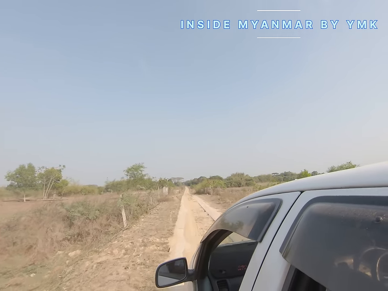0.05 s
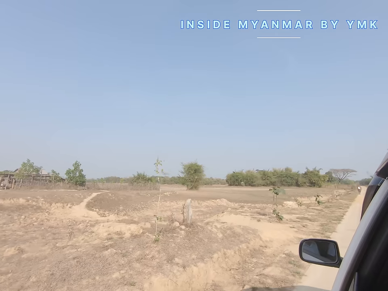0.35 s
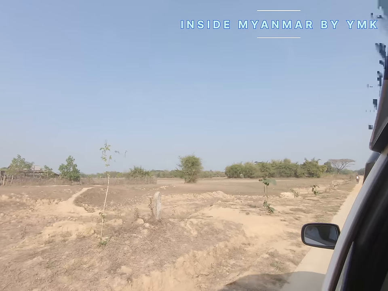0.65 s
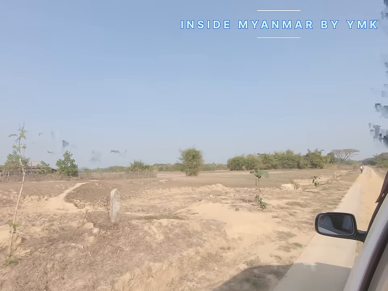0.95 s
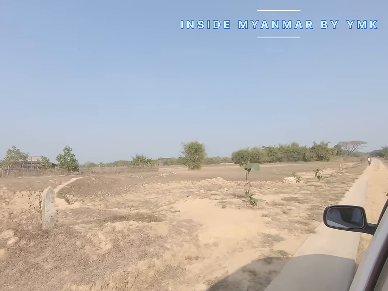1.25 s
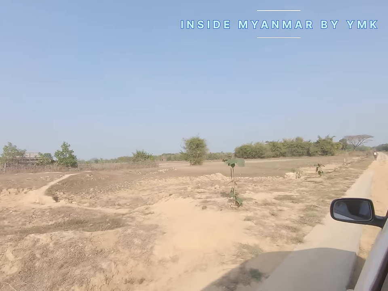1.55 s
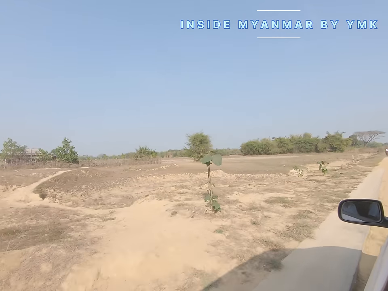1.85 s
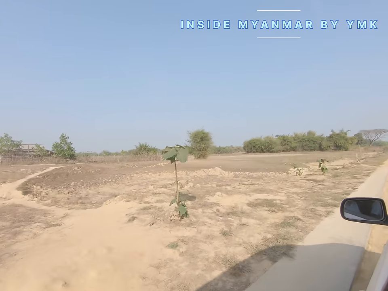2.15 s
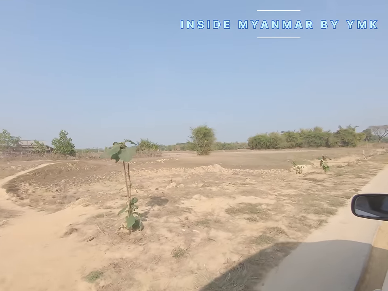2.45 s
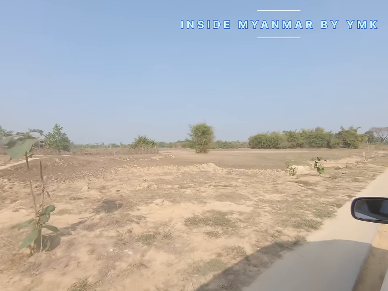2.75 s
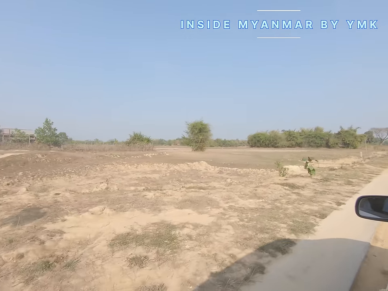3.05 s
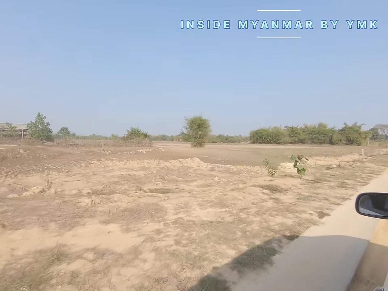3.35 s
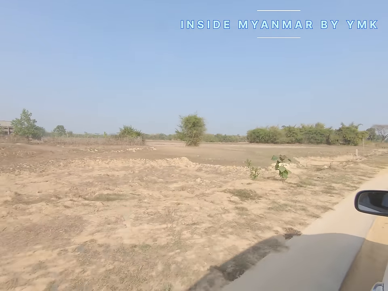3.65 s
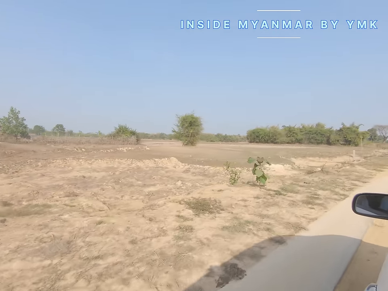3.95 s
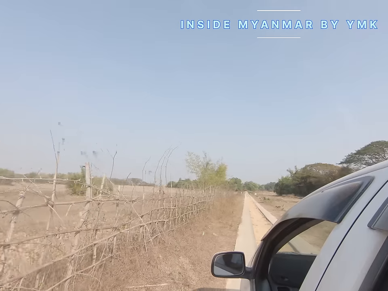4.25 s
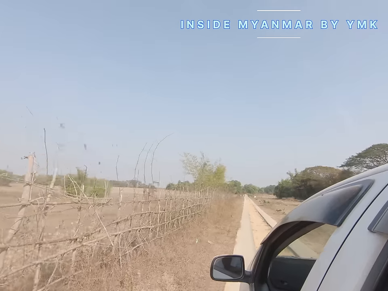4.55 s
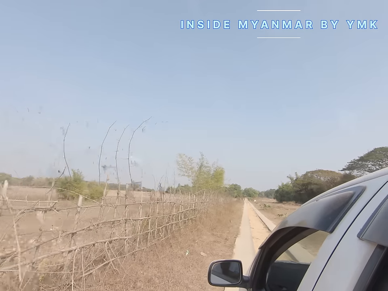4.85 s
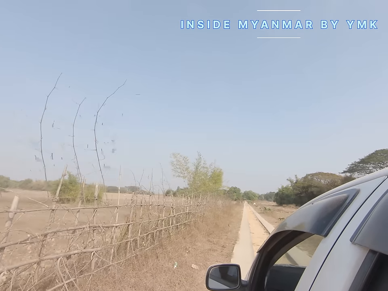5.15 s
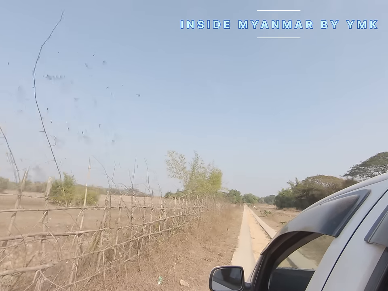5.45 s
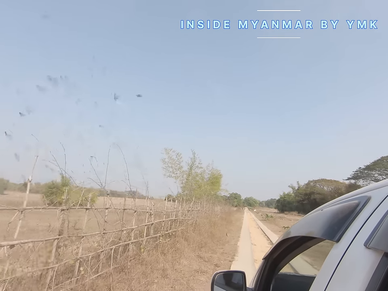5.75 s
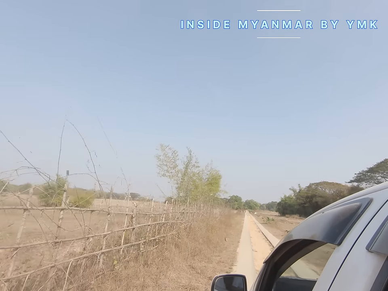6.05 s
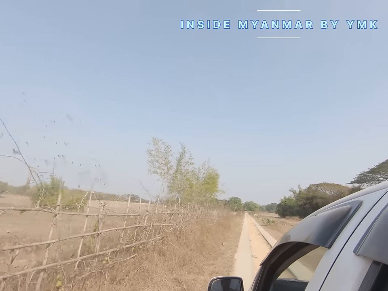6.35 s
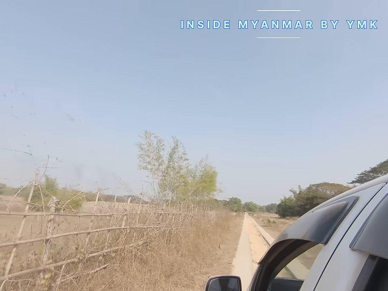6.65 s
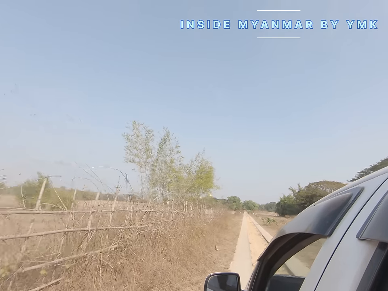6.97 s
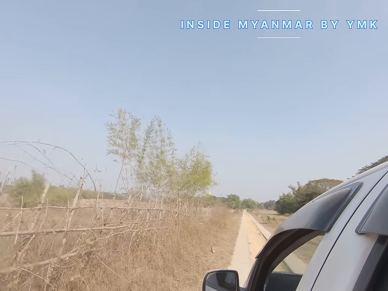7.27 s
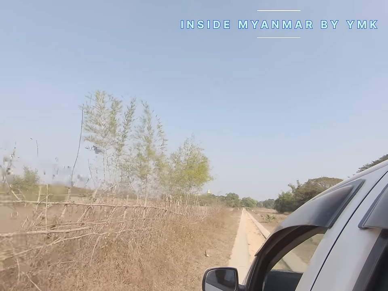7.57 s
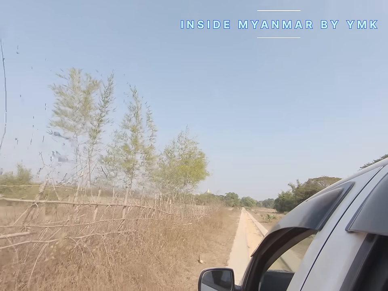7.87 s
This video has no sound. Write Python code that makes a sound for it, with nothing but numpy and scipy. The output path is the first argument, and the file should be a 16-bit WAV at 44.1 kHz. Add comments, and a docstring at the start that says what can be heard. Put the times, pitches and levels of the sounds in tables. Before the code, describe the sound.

Wind buffets a microphone held out of a car on a country road, a loud low rumble full of thumps and slaps. It cuts out for an instant just after the start. A distant bird chirps faintly over a thin hiss, then both stop as the wind builds to a rough, crackling peak. After a second brief dropout, softer, duller gusts rumble over quietly rolling tyres.

```python
"""Wind from a car window

Wind buffets a microphone held out of a car on a country road, in three stretches with brief dropouts
between them. Eddies (swirls of air) rumble and slap on it. At first air hisses over its two ports
(openings) and a bird sings a short echoing phrase; then these stop and both sides sound the same.
After the second dropout a softer wind rumbles over the rolling of the tyres."""
import sys
import numpy as np
from scipy import signal
from scipy.fft import rfft, irfft, next_fast_len
from scipy.io import wavfile
from scipy.ndimage import uniform_filter1d

SR = 44100
rng = np.random.default_rng(int(sys.argv[2]) if len(sys.argv) > 2 else 0)


def to_wav(sig):
    """Store sig (one row per channel, or 1-D mono) as 16-bit WAV at the path in sys.argv[1].

    Samples outside -1..1 are clipped; the rate is SR.
    """
    pcm = np.clip(np.atleast_2d(sig), -1, 1) * 32767
    pcm = np.round(pcm).astype(np.int16)
    wavfile.write(sys.argv[1], SR, pcm.T)  # frames by channels


N = 348831
TIME = np.arange(N) / SR


# Tone colours of strong rumble, soft rumble, churning, tearing and hiss.
# Each row: frequency in Hz, relative level in dB.
STRONG_RUMBLE = [(8, -39.5), (18, -1), (30, -4.5), (60, -2), (95, 1.5), (160, -5.5), (230, -19.5),
                 (400, -43), (900, -96), (16000, -120)]
SOFT_RUMBLE = [(8, -32.5), (18, 2), (35, 4), (65, 2.5), (115, -2), (160, -11.5), (230, -29), (400, -70),
               (900, -87)]
CHURN_COLOUR = [(80, -17.5), (140, -2), (200, 5), (300, -2.5), (420, -11), (600, -21.5), (1000, -53.5),
                (2500, -86.5), (16000, -110)]
TEAR_COLOUR = [(200, -24.5), (450, 12.5), (700, 6.5), (1000, -1.5), (1400, -13), (2000, -16.5),
               (3500, -40.5), (6000, -56.5), (9000, -80.5)]
HISS_COLOUR = [(600, 5.5), (1300, 3), (1800, -6.5), (2500, -6), (3300, -9.5), (4400, -14), (6000, -28),
               (8000, -48.5), (10000, -52.5), (16000, -72)]
# How squarely the wind meets the port, which helps it tear. Each row: time in seconds, boost in dB.
FACING = [(0, 7.5), (.8, -10), (2.2, -2), (3.25, -8), (3.55, -1), (4.085, -7), (4.25, 2), (7.91, -14)]
# Dull hiss of the strongest wind. Each row: time in seconds, level in dB.
HISS_LEVEL = [(2.76, -44), (2.87, -80), (3.1, -56), (3.14, -39.5), (3.3, -44.5), (3.37, -41.5), (3.57, -60),
              (3.9, -44.5), (4.085, -44)]

def wind(churn_db=-1.62, tear_db=-16, strong_db=-28, tear_growth=1.3):
    """Wind comes in bursts: big eddies rumble, smaller ones churn, the finest tear off and hiss."""
    sway = wander(22)
    buffet = wind_level(1) * from_db(.7 * sway)
    churn = wind_level(2) * from_db(1.25 * sway)
    bursts = np.minimum(unit(wander(150) + 1.5 * wander(45)), 2.1)
    # stronger wind rumbles higher
    strength = np.clip(uniform_filter1d(buffet, SR // 2) / from_db(-17), 0, 1)
    rumble = np.sqrt(strength) * noise(STRONG_RUMBLE) + np.sqrt(1 - strength) * noise(SOFT_RUMBLE)
    deep = from_db(1) * buffet * steadied(rumble * from_db(3 * wander(60)), .04)
    body = from_db(churn_db) * churn * steadied(noise(CHURN_COLOUR) * from_db(3 * bursts), .033)
    # fine eddies grow faster than the wind that sheds them
    tearing = from_db(strong_db + tear_db + follow(FACING)) * (churn / from_db(strong_db)) ** tear_growth
    fine = tearing * steadied(noise(TEAR_COLOUR) * from_db(6 * bursts), .29)
    hiss = level(HISS_LEVEL) * unit(noise(HISS_COLOUR) * from_db(4 * bursts))
    return deep + body + fine + hiss


# One list for each stretch of wind. Each row: time in seconds, rumble in dB, churning in dB.
WIND_STRETCHES = [
    [(0, -26, -32.5), (.121, -21, -36.5)],
    [(0.25, -39, -38.5), (0.27, -30, -44), (0.33, -21.5, -29), (0.42, -19, -31.5), (0.49, -19, -28),
     (0.65, -25, -30.5), (0.72, -20, -23), (0.89, -20, -36), (0.91, -19.5, -24), (1.11, -24, -28),
     (1.18, -21.5, -39), (1.32, -22.5, -23.5), (2.49, -21, -24), (2.51, -25.5, -30), (2.68, -20.5, -24),
     (3.5, -20, -19), (4.04, -18, -22), (4.08, -22.5, -32)],
    [(4.25, -37, -50), (4.29, -35, -56), (4.88, -29.5, -40.5), (5.15, -26, -43), (5.19, -21, -26),
     (5.27, -30.5, -41), (5.65, -32.5, -54), (5.95, -24.5, -34), (6.21, -31, -48), (6.31, -28.5, -61),
     (6.44, -28.5, -33.5), (6.49, -32.5, -69), (6.69, -20.5, -30.5), (6.88, -31.5, -49), (7.19, -20, -45),
     (7.27, -34, -51), (7.8, -24.5, -37.5), (7.91, -26.5, -37)],
]
# Swells and lulls. Each row: middle in seconds, half length in seconds, change in dB.
SURGES = [(.405, 0.024, -6), (0.492, 0.033, -1.5), (0.628, 0.023, -7), (0.793, 0.024, 1),
          (0.881, 0.013, -9.5), (.92, .03, 2), (0.995, 0.023, 3.5), (1.161, 0.011, -5), (1.26, 0.016, 1),
          (1.39, 0.018, -1), (1.462, 0.033, -2), (1.65, .015, 1.5), (1.722, 0.023, 2), (2.005, .014, -5.5),
          (2.225, 0.018, -3.5), (2.262, .02, 2.5), (2.328, 0.017, 3), (2.35, 0.0076, -3),
          (2.449, .014, -6.5), (2.485, 0.015, 4.5), (2.523, .018, -6.5), (2.6, .04, -0.5),
          (2.857, 0.015, 5), (2.962, 0.019, 0.5), (3.063, 0.047, 1.5), (3.14, 0.012, -6), (3.268, 0.024, 2),
          (3.277, 0.0087, -3), (3.408, 0.024, 2), (3.534, 0.04, -7), (3.597, 0.0099, -4), (3.693, 0.023, 1),
          (3.749, 0.022, 1), (3.824, 0.022, -5.5), (3.885, 0.014, -1.5), (4.33, .03, 8),
          (4.405, 0.02, -3.5), (4.705, 0.063, 5), (4.82, 0.012, -8), (5.138, 0.046, 3), (5.35, 0.034, -4.5),
          (5.678, 0.025, -7.5), (5.786, 0.02, -11.5), (5.88, 0.018, 3.5), (6.22, .025, -5.5),
          (6.376, 0.021, 1), (6.934, 0.011, -1), (7.088, 0.022, 3), (7.313, 0.035, -0.5),
          (7.532, 0.018, 1.5), (7.668, 0.044, 2.5), (7.741, 0.016, -10.5), (7.844, 0.025, -6)]

def wind_level(column):
    """How strongly the wind rumbles (column 1) or churns (column 2); zero in the dropouts."""
    surge_db = sum(db * bump(middle, width) for middle, width, db in SURGES)
    return sum(level(rows, column) for rows in WIND_STRETCHES) * from_db(surge_db)


# Big eddies. Each row: time in seconds, length in seconds, then thump, slap and crack levels in dB.
BIG_GUSTS = [(0.044, 0.017, -42, -34.5, -43), (0.122, 0.0016, -26, -22.5, -30),
             (0.305, 0.0019, -18, -32, -50), (0.34, 0.0049, -9, -40, -48), (0.491, 0.0025, -21, -51, -66),
             (0.534, 0.0027, -26, -33, -66), (0.69, 0.0066, -18, -32, -52),
             (0.735, 0.0047, -12.5, -30.5, -52), (0.925, 0.00073, -5.5, -13, -53),
             (0.947, 0.003, -38, -13.5, -31), (0.966, 0.0049, -7.5, -30, -42),
             (1.014, 0.0035, -14, -17, -46), (1.085, 0.0038, -9.5, -22.5, -38),
             (1.095, 0.0053, -14.5, -19.5, -40), (1.33, 0.0064, -12, -24, -49),
             (1.407, 0.0015, -15, -48, -66), (1.463, 0.0023, -30, -23, -37), (1.57, 0.012, -14.5, -29, -40),
             (1.588, 0.0034, -7.5, -24.5, -32.5), (1.63, 0.0024, -19.5, -23, -38),
             (1.702, 0.005, -15.5, -22.5, -34), (1.845, 0.0018, -14, -21.5, -32),
             (1.861, 0.0044, -27, -24.5, -47), (1.945, 0.013, -12, -30.5, -38),
             (1.968, 0.011, -10.5, -29, -40), (2.032, 0.0042, -14.5, -24, -56),
             (2.061, 0.0031, -6, -24.5, -38), (2.125, 0.0013, -4.5, -7.5, -29),
             (2.143, 0.014, -8.5, -31, -37), (2.294, 0.0023, -10.5, -20, -51),
             (2.376, 0.0035, -16, -23, -55), (2.393, 0.0053, -10, -19, -30),
             (2.407, 0.0098, -9, -19.5, -27.5), (2.413, 0.0048, -18, -16, -45),
             (2.562, 0.016, -20, -23.5, -104), (2.628, 0.0014, -15, -24.5, -63),
             (2.716, 0.016, -17.5, -24, -41), (2.824, 0.029, -34, -41, -43),
             (2.902, 0.0021, -14.5, -20, -32.5), (2.924, 0.0011, -8, -14, -34),
             (3.002, 0.004, -23, -19.5, -61), (3.115, 0.0023, -28, -29, -33),
             (3.126, 0.0075, -18, -20, -29), (3.131, 0.0084, -19.5, -21.5, -35),
             (3.137, 0.0016, -17.5, -15, -43), (3.176, 0.0017, -17, -12, -53),
             (3.357, 0.0027, -29, -13, -35), (3.368, 0.0019, -14, -8.5, -18), (3.459, 0.0011, -7, -23, -38),
             (3.476, 0.0035, -2.5, -21, -35), (3.5, 0.0036, -26.5, -16, -38),
             (3.507, 0.0028, -16, -13.5, -30), (3.524, 0.0033, -24.5, -17, -36),
             (3.542, 0.0027, -28, -16.5, -39), (3.559, 0.0029, -4.5, -28, -52),
             (3.584, 0.0018, -20.5, -17.5, -41.5), (3.628, 0.0017, -22, -19, -46),
             (3.645, 0.0034, -18.5, -17.5, -45), (3.665, 0.0032, -18.5, -17.5, -44.5),
             (3.709, 0.0033, -15, -17.5, -47), (3.749, 0.02, -14.5, -26, -50.5),
             (3.769, 0.0031, -14, -25.5, -56), (3.827, 0.019, -28, -24.5, -44),
             (3.855, 0.0026, -24.5, -20, -57.5), (3.957, 0.0081, -29, -20, -41.5),
             (3.992, 0.012, -32.5, -18.5, -40), (4.012, 0.0019, -16, -26, -29),
             (4.051, 0.0028, -10.5, -44.5, -33), (4.073, 0.019, -22.5, -37.5, -30.5),
             (4.327, 0.0036, -33, -68, -73), (4.468, 0.0034, -40, -67, -79),
             (4.943, 0.0047, -16.5, -38, -70), (5.198, 0.0034, -6.5, -30.5, -45.5),
             (5.203, 0.0019, 3.5, -24, -47.5), (5.72, 0.0053, -21, -68, -52),
             (5.984, 0.0085, -20, -58, -66), (6.427, .006, -15.5, -55, -50), (6.685, 0.0021, -19, -59, -74),
             (6.74, 0.0027, -11, -31, -66), (6.757, 0.0023, -12.5, -37, -74),
             (6.96, 0.0034, -2, -33.5, -56), (7.019, 0.0034, -17, -43, -68),
             (7.119, 0.0079, -17.5, -40.5, -67), (7.174, 0.0028, -5, -47, -70),
             (7.686, 0.0044, -19, -38, -62)]
# Tone colour of all hits. Each row: frequency in Hz, relative level in dB.
GUST_COLOUR = [(50, 0.5), (170, -7), (330, -6), (620, -6.5), (1000, -12), (1800, -8), (3300, -20),
               (5000, -42), (9000, -63.5)]
# Deeper parts of a hit last longer. Each row: low edge in Hz, high edge in Hz, length multiplier.
GUST_BANDS = [(60, 633, 1.77), (374, 1310, 1.28), (1190, 8300, 0.9)]
# Softer wind hits more dully. Each row: time in seconds, top of the thump in Hz, top of the slap in Hz.
GUST_TOPS = [(4.085, 253.5, 990), (4.25, 201, 845), (6.4, 214, 720)]

def gusts(hits, gain_db=-3):
    """An eddy hits the port: a long low thump around a shorter slap and crack."""
    out = np.zeros(N)
    t = (np.arange(4096) - 2048) / SR
    hz = np.fft.rfftfreq(len(t), 1 / SR) + 1
    shape_db = colour_db(GUST_COLOUR, hz)
    top_times, *tops = np.transpose(GUST_TOPS)
    taper = signal.windows.tukey(len(t), .5)
    thump_bins = np.sum((hz > 100) & (hz < 400))
    for when, length, thump_db, slap_db, crack_db in hits:
        thump_hz, slap_hz = (np.interp(when, top_times, top) for top in tops)
        corners_hz = [thump_hz, 2.35 * thump_hz, slap_hz, 1730]
        hit_db = np.interp(hz, corners_hz, [thump_db, slap_db, slap_db, crack_db])
        colour = from_db(gain_db + shape_db + hit_db)
        for low_hz, high_hz, stretch in GUST_BANDS:
            band = colour / np.sqrt((1 + (low_hz / hz) ** 8) * (1 + (hz / high_hz) ** 8))
            width = length * stretch
            spectrum = rfft(rng.standard_normal(len(t)) * np.exp(-2 * (t / width) ** 2))
            spectrum /= np.sqrt(abs(spectrum) + 1e-9)  # evened out, so the blow has no pitch
            puff = taper * irfft(band * spectrum)
            energy = width * SR * np.sum(band ** 2) / thump_bins
            add(out, when + t[0], puff * np.sqrt(energy / np.sum(puff ** 2)))
    return out


def small_gusts(per_s=22, typical_s=.0025, spread_db=4, strong_db=-23, growth=1.4):
    """Rows for small random hits, sharper where the wind is strong and meets the port squarely."""
    churn, facing = wind_level(2), follow(FACING)
    rows = []
    for slot, (offset, size, span) in enumerate(rng.random((int(N / SR * per_s), 3))):
        when = (slot + offset) / per_s
        at = int(when * SR)
        if churn[at] > 0:
            db = 20 * np.log10(churn[at]) + spread_db * (2 * size - 1)
            sharp_db = min(strong_db + growth * (db - strong_db) + facing[at], -16)
            rows.append((when, typical_s * (.5 + span), db + 3, sharp_db - 10, sharp_db - 29))
    return rows


# The low part of a wake. Each row: frequency in Hz, relative level in dB.
WAKE_COLOUR = [(30, -15.5), (70, -5), (125, 1), (200, -10.5), (400, -22.5), (900, -62.5), (3000, -115)]

def wakes(rise_s=.013, fall_s=.014, low_db=-12, high_db=-13, full_drag_s=.0049):
    """Ragged air runs just ahead of each big eddy and trails behind it; a brief eddy drags less."""
    t = np.arange(-SR // 8, SR // 4) / SR
    shape = np.exp(np.minimum(t / rise_s, -t / fall_s))
    low, high = np.zeros((2, N))
    for when, length, thump_db, slap_db, _ in BIG_GUSTS:
        drag = min(length / full_drag_s, 1) * shape
        add(low, when + t[0], from_db(thump_db + low_db) * drag)
        add(high, when + t[0], from_db(slap_db + high_db) * drag)
    ragged = unit(noise(TEAR_COLOUR) * from_db(5 * wander(220)))
    return low * steadied(noise(WAKE_COLOUR), .13) + high * ragged


# Ripping at the height of the wind. Each row: time in seconds, level in dB.
RIP_LEVEL = [(3.44, -42), (3.5, -39), (3.55, -36), (3.6, -42), (3.64, -41), (3.72, -30), (3.82, -39.5),
             (3.88, -50), (3.97, -33), (4.08, -62)]
# Each row: frequency in Hz, relative level in dB.
RIP_COLOUR = [(250, -19), (500, 5), (800, 12), (1200, -1), (1700, -12), (2500, -35), (4000, -28.5),
              (8000, -70.5)]

def rip(per_s=95, spread_db=4, pop_s=.006):
    """Tiny eddies tear off so fast that they merge into one rough rasp."""
    pops = rng.random(N) < per_s / SR
    sizes = from_db(spread_db * np.minimum(rng.exponential(1, N), 2))
    swell = signal.oaconvolve(pops * sizes, np.hanning(int(pop_s * SR)), "same")
    return level(RIP_LEVEL) * steadied(noise(RIP_COLOUR) * swell, .056)


# Each row: start in seconds, relative level in dB, length of the jump in seconds.
SNAPS = [(0.921, -23, 0.00038), (1.589, -16.5, 0.00029), (2.121, -16.5, 0.00015), (2.295, -30, 0.00028),
         (2.627, -30, 0.00044), (2.924, -23.5, .00016), (3.1232, -16.5, 0.00015), (3.1745, -25, 0.00033),
         (3.371, -16, .00014), (3.458, -27, 0.00027), (3.5065, -29, 0.00022), (3.518, -24, 0.00024),
         (3.582, -33, .0003), (3.664, -29, 0.00038), (3.72, -29, 0.00052), (3.769, -28.5, 0.00049),
         (3.8525, -29.5, .0004), (3.989, -23, 0.00019), (4.0115, -14, 0.00022)]

def snaps(sharpness=.46, gain_db=6):
    """The flow snaps off the port: pressure jumps and rebounds. Longer snaps are duller."""
    out = np.zeros(N)
    for start, db, length in SNAPS:
        age = np.arange(256) / SR / length
        jump = (1 - age) * np.exp(-age)
        lowpass = signal.butter(5, min(sharpness / length, 4000), fs=SR, output="sos")
        add(out, start, from_db(gain_db + db) * signal.sosfilt(lowpass, jump))
    return out


def knock(start=2.414, hz=890, db=-22, ring_s=.059):
    """One hard gust sets a hollow of the housing ringing."""
    out, t = np.zeros(N), np.arange(SR // 8) / SR
    add(out, start, from_db(db - 60 * t / ring_s) * np.sin(2 * np.pi * hz * t))
    return out


# Each row: time in seconds, relative level in dB.
RUSH_LEVEL = [(0, -59.5), (.7, -60), (1.25, -56), (1.64, -56.5), (1.9, -59.5), (2.4, -58.5), (2.66, -52),
              (2.7, -44.5), (2.75, -46)]
# Each row: frequency in Hz, then the left and right relative levels in dB.
PORT_COLOURS = [(101.4, -30, -48), (700, -34.5, -8.5), (1100, -9, -5.5), (1630, -13, -5), (2300, -5, -1),
                (3380, -9.5, 3), (3820, -6.5, -1.5), (4250, -11.5, 3), (4600, -11.5, -2.5),
                (6120, -23, 3.5), (6600, -24, 6), (7230, -29, -0.5), (7800, -15.5, -2), (8700, -7, -23.5),
                (10770, -10.5, -22.5), (13000, -23, -13.5), (15150, -39, -15.5), (15900, -47, -4)]

def rush(left_db=6.5, right_db=12):
    """Air rushes over the two ports, and each hisses with its own tone colour."""
    ports = np.asarray(PORT_COLOURS)
    left = from_db(left_db) * noise(ports[:, [0, 1]])
    right = from_db(right_db) * noise(ports[:, [0, 2]])
    return np.array([left, right]) * from_db(follow(RUSH_LEVEL) + 1.16 * wander(100) + .23 * wander(18))


# Each row: start and length in seconds, first, middle and last pitch in Hz, level in dB, roughness.
BIRD_NOTES = [(.485, 0.041, 2190, 2110, 2120, -51.5, 0.17), (.572, 0.025, 3130, 3110, 3130, -56, .2),
              (.77, 0.045, 4470, 4400, 4360, -58, 0.27), (.772, 0.073, 2105, 2306, 2280, -53.5, 0.23),
              (.866, 0.042, 2550, 2730, 2600, -40, 0.11), (.982, 0.024, 3410, 3000, 2780, -40.5, 0.23),
              (1.11, 0.039, 3930, 4170, 3800, -40.5, 0.12), (1.152, .036, 3864, 3850, 3670, -41.5, 0.19),
              (1.188, 0.022, 3750, 3370, 3040, -37, .15), (1.396, 0.059, 4000, 3970, 3770, -41.5, 0.13),
              (1.47, 0.035, 3880, 3530, 3190, -36, 0.22), (1.52, 0.032, 5510, 6240, 6500, -50, 1.1),
              (1.55, 0.033, 4330, 4270, 4160, -45.5, 0.3), (1.55, 0.022, 3490, 3490, 3400, -43.5, 0),
              (1.602, 0.047, 5440, 5100, 4200, -41.5, 0.55), (1.648, 0.046, 3655, 3106, 2730, -43.5, 0.46),
              (1.825, 0.031, 3580, 3530, 3670, -44, 0.1), (1.885, 0.053, 3800, 3600, 3720, -61, .04),
              (1.825, 0.17, 5470, 5280, 5100, -61, 0.3), (2.06, 0.033, 6570, 6530, 6430, -45, 0.37),
              (2.065, 0.051, 5360, 5280, 4880, -51.5, 1.22), (2.075, 0.045, 3360, 3320, 3300, -51, 0.73),
              (2.129, 0.12, 4410, 4290, 4170, -59, 0.46), (2.3, 0.18, 4090, 4140, 4240, -60, 0.65),
              (2.54, 0.034, 6650, 6800, 7200, -48, 0.24)]

def bird(echo_s=.47):
    """A distant bird whistles; scattered echoes trail it, different at each port."""
    song = whistles(BIRD_NOTES)
    t = np.arange(SR // 2) / SR
    scatter = rng.standard_normal((2, len(t))) * from_db(-60 * t / echo_s) * np.minimum(t / .0013, 1)
    echo = signal.fftconvolve(song[None], scatter / np.linalg.norm(scatter[0]), axes=1)[:, :N]
    return song * from_db([[-4], [-1]]) + echo * from_db([[-1.5], [5.5]])  # left, right


# Each row: start and length in seconds, first, middle and last pitch in Hz, level in dB, roughness.
FAINT_WHISTLES = [(2.807, 0.048, 1400, 1545, 1800, -50.5, 0.93), (2.811, 0.086, 2160, 2180, 2080, -62, 0.5),
                  (3.373, 0.039, 1270, 1186, 1245, -42, 0.64), (3.376, 0.066, 2590, 2470, 2490, -55.5, .45),
                  (4.049, 0.011, 1170, 1146, 1226, -29.5, 0.5)]

def faint_whistles():
    """A few faint, brief, rough whistling tones."""
    return whistles(FAINT_WHISTLES)


# Tyres (two stretches) and their hollow roar. Each row: time in seconds, level in dB.
TYRE_STRETCHES = [
    [(0, -57.5), (2.7, -46.5), (4.085, -64.5)],
    [(4.21, -72), (4.26, -49.5), (5.1, -49), (5.4, -52.5), (6.45, -48.5), (7.4, -50), (7.91, -49.5)],
]
ROAR_LEVEL = [(4.25, -68), (4.55, -58.5), (4.75, -50.5), (5.1, -51.5), (5.4, -56), (6.2, -71), (6.5, -54.5),
              (6.9, -63), (7.91, -66.5)]
# Each row: frequency in Hz, relative level in dB.
TYRE_COLOUR = [(100, 1), (300, 4), (520, -4.5), (700, -16), (900, -15.5), (1600, -14), (2200, -17),
               (3100, -21), (4500, -31.5), (6500, -42.5), (8000, -54), (15000, -78)]
ROAR_COLOUR = [(150, -26.5), (380, 4.5), (520, 6.5), (700, -0.5), (900, -24.5), (1500, -37), (5000, -81.5)]

def road(flutter_db=1):
    """Tyres roll evenly on the road; a hollow roar swells now and then."""
    tyres = sum(level(rows) for rows in TYRE_STRETCHES) * noise(TYRE_COLOUR)
    roar = level(ROAR_LEVEL) * noise(ROAR_COLOUR)
    return (tyres + roar) * from_db(flutter_db * wander(30))


# Each row: middle in seconds, half length in seconds, level in dB.
SWISHES = [(6.46, 0.055, -70), (7.853, 0.13, -59)]
# Each row: frequency in Hz, relative level in dB.
SWISH_COLOUR = [(500, -12), (1500, 6.5), (3000, -8), (5000, -22), (9000, -33), (16000, -55)]

def swishes():
    """Bushes and fence throw back a little more road noise as they go by."""
    swell = sum(from_db(db) * bump(middle, width) for middle, width, db in SWISHES)
    return swell * noise(SWISH_COLOUR)


# Each row: time in seconds, relative level in dB.
RINGING_LEVEL = [(0, -57), (.5, -68), (.8, -64), (1.4, -60.5), (1.9, -65), (2.7, -69)]
# Each row: frequency in Hz, relative level in dB.
RINGING_COLOUR = [(3100, -49.5), (3400, -2), (3700, -29), (4120, -4), (4500, -34.5), (6000, -29.5),
                  (6550, 5), (7200, -31), (9000, -60)]

def ringing(left_db=-5, right_db=3):
    """Three thin, high bands of noise, perhaps far insects, mostly on the right."""
    return level(RINGING_LEVEL) * noise(RINGING_COLOUR) * from_db([[left_db], [right_db]])


# Each row: time in seconds, level in dB.
SHEEN_LEVEL = [(3.32, -64), (3.35, -65.5), (3.6, -66), (4.085, -73)]
# Each row: frequency in Hz, relative level in dB.
SHEEN_COLOUR = [(3000, 2.5), (5500, 5.5), (8300, -6.5), (9500, -18.5), (12000, -37.5), (16000, -54.5)]

def sheen():
    """A faint bright hiss on top of the strongest wind."""
    return level(SHEEN_LEVEL) * noise(SHEEN_COLOUR)


def dropout_tick(db=-30, fade_s=.0001):
    """A small tick where the wind first cuts out."""
    out = np.zeros(N)
    add(out, WIND_STRETCHES[0][-1][0], from_db(db) * np.exp(-np.arange(64) / SR / fade_s))
    return out


def whistles(notes, rasp=.11, rasp_db=6, swell_db=1, attack_s=.0035, release_s=.0053):
    """Nearly pure tones glide through three pitches; in rough notes pitch and level shake quickly."""
    shake, tremble = wander(1100), wander(500)
    out = np.zeros(N)
    for start, length, *pitches, db, rough in notes:
        t = np.arange(0, length, 1 / SR)
        at = round(start * SR) + np.arange(len(t))
        progress = t / length
        hz = np.polyval(np.polyfit([0, .5, 1], pitches, 2), progress)
        turns = np.cumsum(hz * (1 + rasp * rough * shake[at])) / SR
        envelope = np.clip(np.minimum(t / attack_s, (length - t) / release_s), 0, 1)
        tone = np.sqrt(2) * np.sin(2 * np.pi * turns) * envelope
        add(out, start, tone * from_db(db + swell_db * progress + rasp_db * rough * tremble[at]))
    return out


def from_db(db):
    """Turns decibels into a multiplier."""
    return np.exp(np.asarray(db) * (np.log(10) / 20))


def unit(x):
    """Scales to an average power of 1."""
    return x / np.sqrt(np.mean(x ** 2) + 1e-20)


def follow(rows, column=1):
    """One column of a table, joined by straight lines over time."""
    rows = np.asarray(rows)
    return np.interp(TIME, rows[:, 0], rows[:, column])


def during(start, end):
    """1 between two times, with fades of 2 ms."""
    return np.clip(np.minimum(TIME - start, end - TIME) / .002, 0, 1)


def bump(middle, width):
    """A bell-shaped rise and fall."""
    return np.exp(-((TIME - middle) / width) ** 2)


def level(rows, column=1):
    """A dB curve as a multiplier, silent outside its span."""
    return from_db(follow(rows, column)) * during(rows[0][0], rows[-1][0])


def add(mix, seconds, sound):
    """Mixes a sound in from the given time on."""
    start = round(seconds * SR)
    sound = sound[max(-start, 0):]
    part = mix[max(start, 0):][:len(sound)]
    part += sound[:len(part)]


def colour_db(colour, hz):
    """The level of a tone colour at each frequency."""
    points_hz, db = np.transpose(colour)
    return np.interp(np.log(hz), np.log(points_hz), db)


def noise(colour):
    """Noise of power 1 with the given tone colour."""
    size = next_fast_len(N, True)
    gain = from_db(colour_db(colour, np.fft.rfftfreq(size, 1 / SR) + 1))
    return unit(irfft(rfft(rng.standard_normal(size)) * gain, size)[:N])


def wander(per_s):
    """A curve of power 1 through per_s random points a second."""
    knots = rng.standard_normal(N // 8)
    return unit(np.interp(TIME * per_s, np.arange(len(knots)), knots))


def steadied(x, seconds):
    """Holds the power of x near 1 over the given time; faster flutter stays."""
    size = max(int(seconds * SR), 8)
    power = uniform_filter1d(uniform_filter1d(x ** 2, size), size)
    return x / np.sqrt(abs(power) + 1e-9)


def scene(stereo_end_s=2.762):
    """Wind and road are the same on both sides; rush, ringing and bird are wide and stop together."""
    wide = (rush() + ringing() + bird()) * during(0, stereo_end_s)
    blowing = sum(during(rows[0][0], rows[-1][0] + .002) for rows in WIND_STRETCHES)
    air = wind() + rip()
    hits = (gusts(BIG_GUSTS + small_gusts()) + wakes()) * blowing + snaps() + knock()
    return air + hits + sheen() + road() + swishes() + faint_whistles() + dropout_tick() + wide


def record(dry, ceiling=.58, top_hz=15800):
    """Rounds off the largest pressure peaks, then removes the highest treble."""
    rounded = dry / (1 + (dry / ceiling) ** 6) ** (1 / 6)
    lowpass = signal.firwin(511, top_hz, window=("kaiser", 9), fs=SR)
    return signal.oaconvolve(rounded, lowpass[None], "same")


dry = scene()
out = record(dry)
to_wav(out)
```